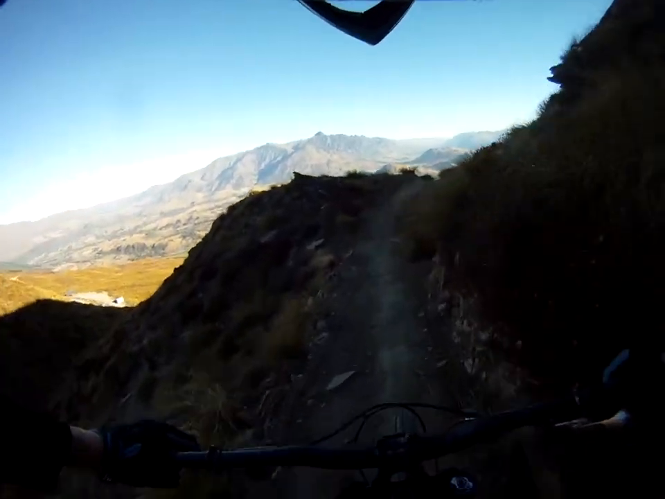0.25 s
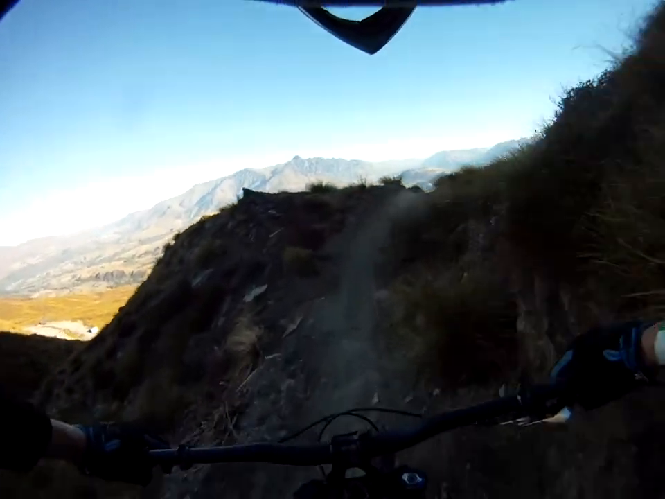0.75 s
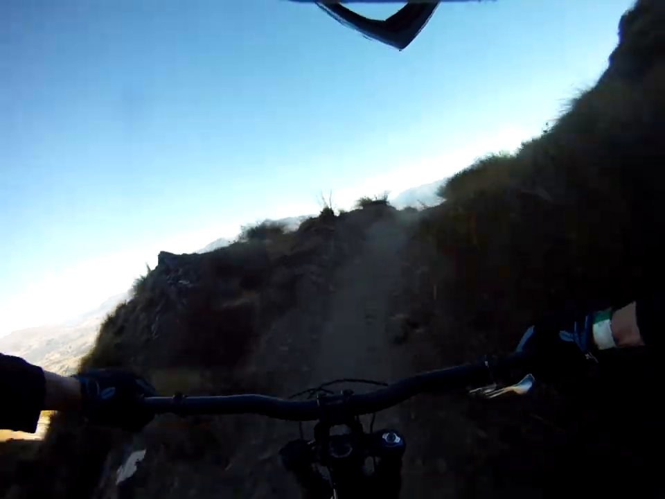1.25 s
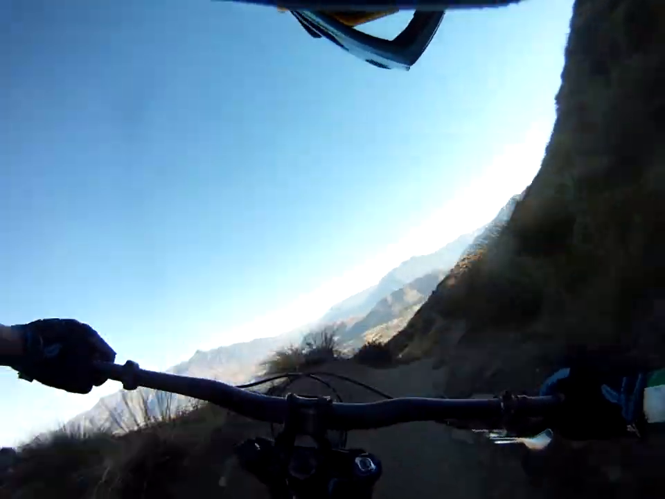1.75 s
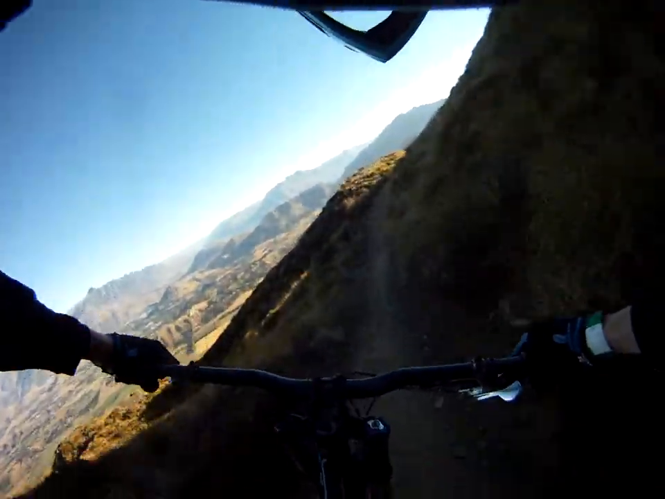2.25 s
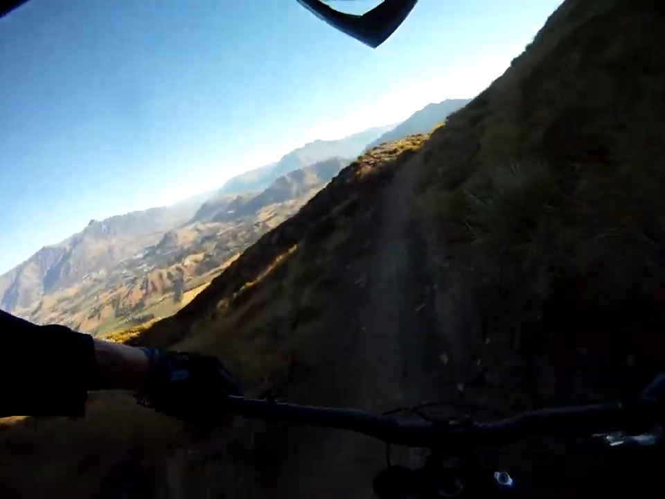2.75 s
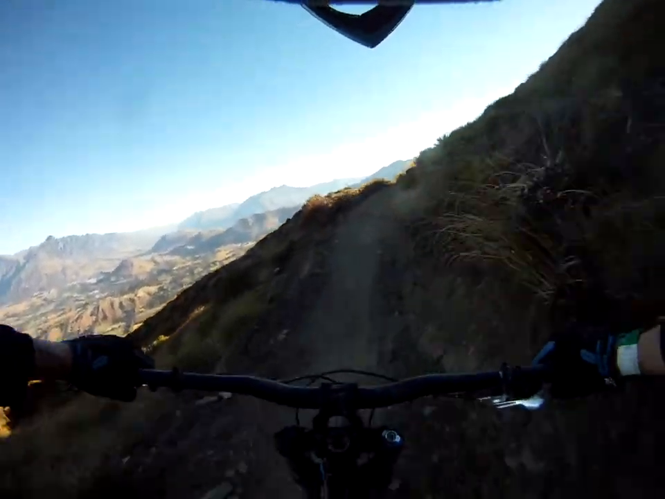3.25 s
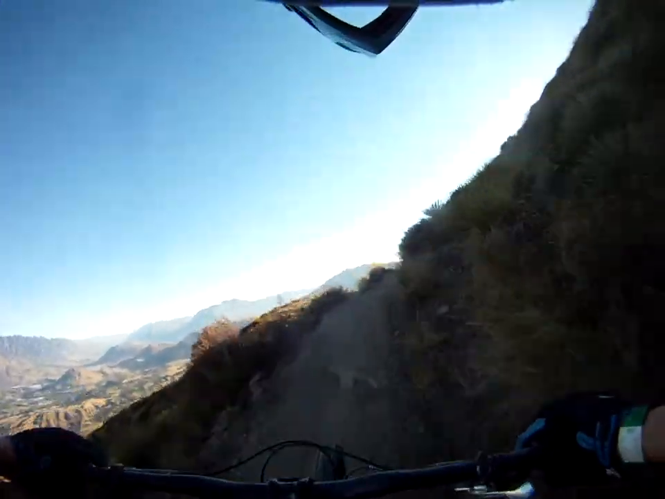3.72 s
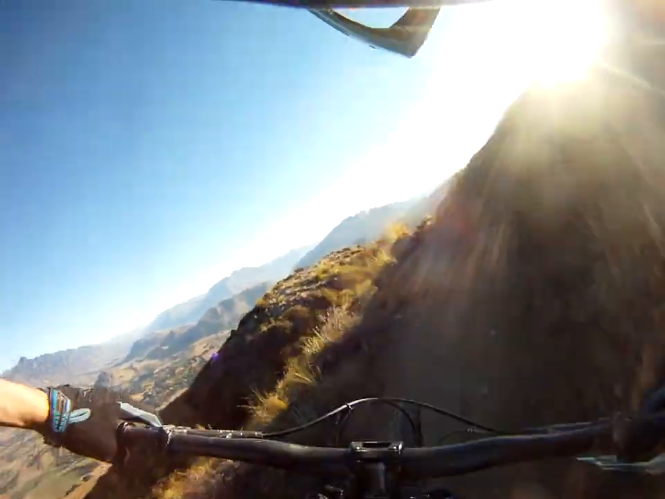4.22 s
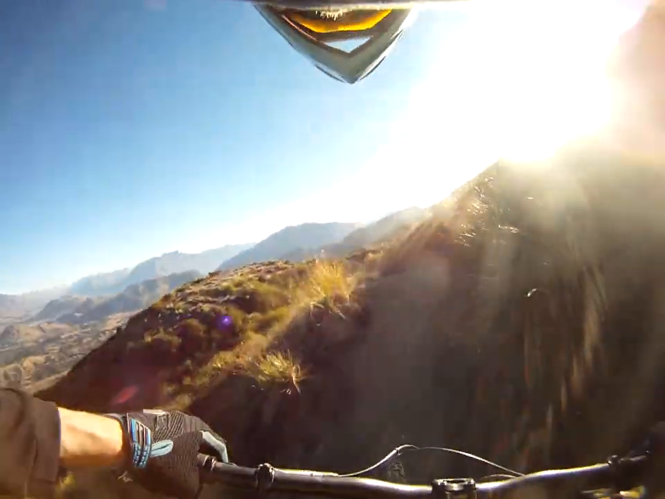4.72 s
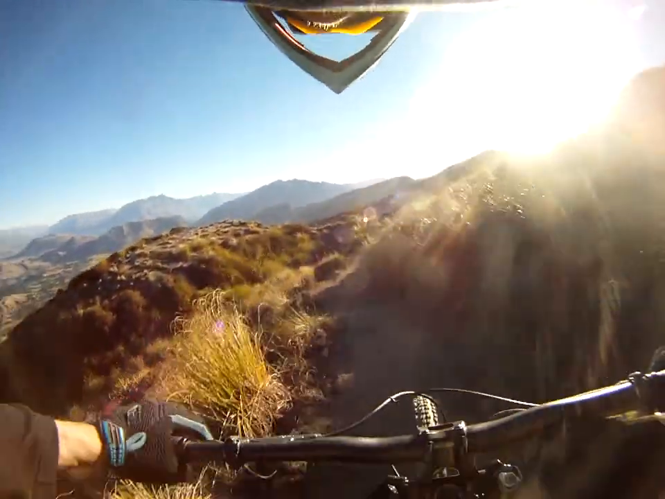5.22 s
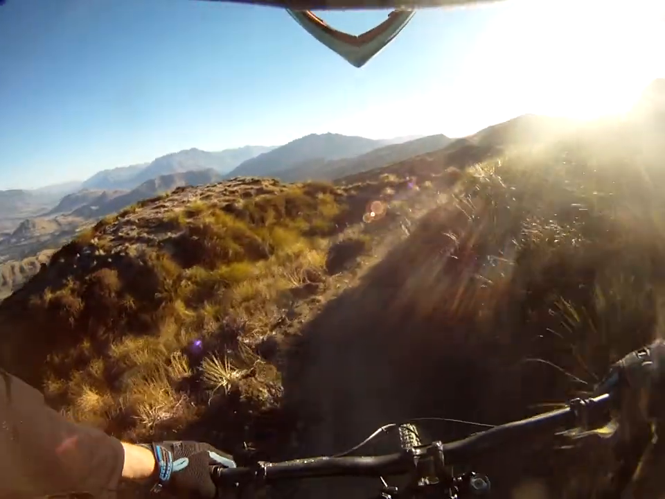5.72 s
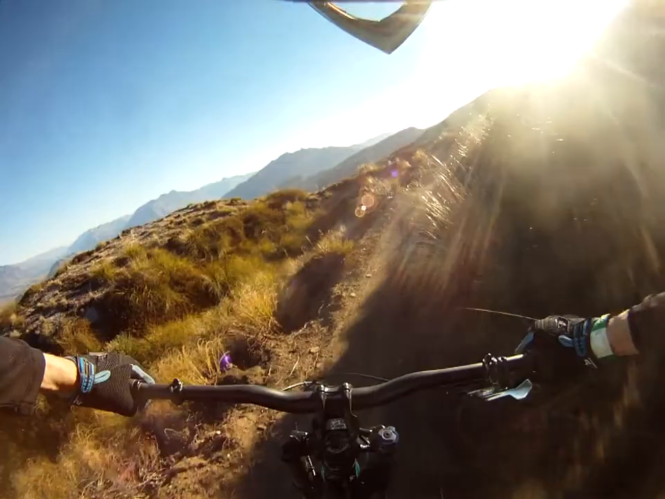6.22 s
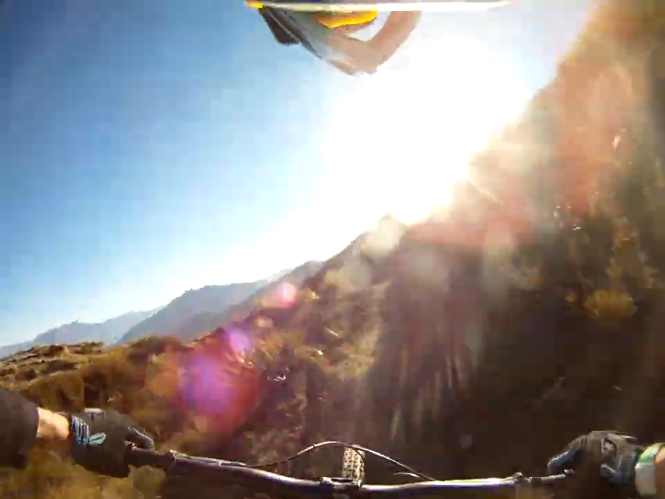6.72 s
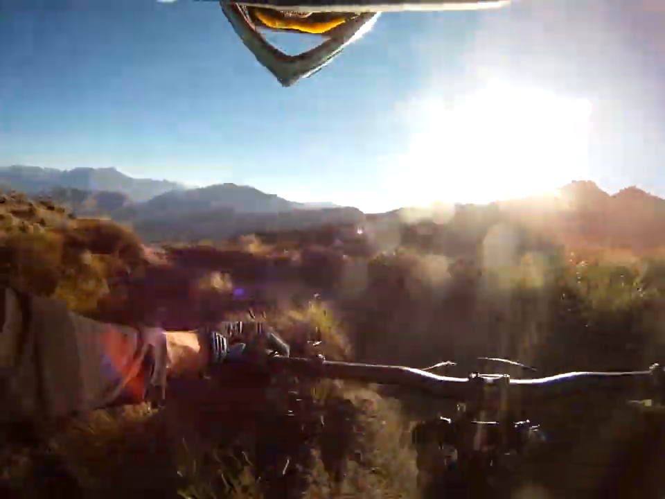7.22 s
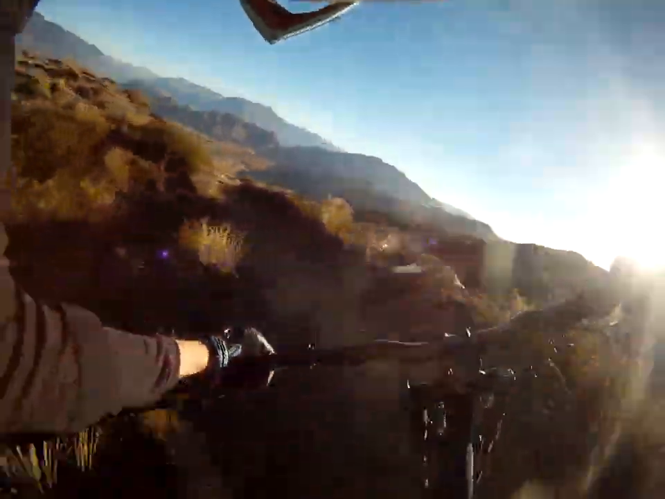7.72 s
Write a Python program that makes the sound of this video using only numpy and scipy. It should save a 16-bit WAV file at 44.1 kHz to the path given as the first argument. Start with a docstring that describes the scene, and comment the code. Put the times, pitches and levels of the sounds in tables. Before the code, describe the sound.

Deep, gusting wind pushes against a helmet-mounted microphone outdoors, over the steady rumble and gravelly crunch of mountain bike tyres. Short chain rattles, plastic knocks and light swishes of grass come and go, and a few stones ping near the middle. The ride eases a little, then speeds up towards the end into thuds, a tiny high chirp and a loud crack from the camera mount before rolling on.

```python
"""On a dry dirt trail, a mountain bike runs downhill, heard from a helmet camera in a plastic case.
Wind buffets the case and hisses past it. The tyres rumble, crunch over stones and spray grit.
Bumps thud through the bike and knock the camera in its mount; one hard hit makes a loud crack.
Chain and cables rattle, grass brushes by, loose stones ping and there is one brief, high chirp."""
import sys
import numpy as np
from scipy import signal
from scipy.fft import rfft, irfft, next_fast_len
from scipy.io import wavfile
from scipy.ndimage import uniform_filter1d

SR = 44100
rng = np.random.default_rng(int(sys.argv[2]) if len(sys.argv) > 2 else 0)


def int16_out(signal):
    """Quantize to a 16-bit WAV file."""
    q = np.round(np.clip(np.atleast_2d(signal).T, -1, 1) * 32767)
    wavfile.write(sys.argv[1], SR, q.astype(np.int16))


N = 351458
TIME = np.arange(N) / SR

# The tone colour of each sound. Each row: frequency in Hz, relative level in dB.
BUFFET_TONE = [(12, -23), (26, -1.5), (45, -2), (70, -0.5), (110, -4.5), (160, -8.5), (230, -14.5),
               (400, -44), (900, -68)]
RUMBLE_TONE = [(110, -22), (200, -5.5), (270, 0.5), (350, -1), (470, -3), (650, -11), (850, -23.5),
               (1200, -27), (2500, -56)]
CRUNCH_TONE = [(500, 1), (900, -2), (1200, -1.5), (1700, -1.5), (2300, 1.5), (3000, 2), (3600, -4.5),
               (4200, -8.5), (5500, -50), (9000, -24), (14000, -45)]
GRIT_TONE = [(1500, -58), (3200, 8.5), (4100, -4), (4700, 4), (5400, -6.5), (6200, -10), (6900, -6.5),
             (7300, 0), (7900, -5.5), (9000, 0), (10000, -8.5), (14000, -20), (15500, 2)]
TICK_TONE = [(700, 1.5), (1500, -0.5), (2400, 0), (3800, -4), (5000, -68), (7200, -25), (9000, -8),
             (15000, -29)]  # plastic on plastic
CRACK_TONE = [(500, -1), (1300, -5.5), (2100, 0.5), (3200, -3), (4050, 4.5), (4700, -23), (7400, -34),
              (7950, -1.5), (9000, -14), (10000, -11), (12000, -41), (14400, -14), (15500, -18)]
RATTLE_TONE = [(400, -7), (1000, 7), (1700, 3.5), (2500, 8), (3200, 16), (4000, -4.5), (4700, 4.5),
               (6000, -21), (7400, -3.5), (9000, 4.5), (10500, -15.5), (15000, -3)]
SWISH_TONE = [(1800, -3.5), (3300, 10.5), (4600, 2.5), (6000, -7.5), (7500, -0.5), (8800, 2), (10000, -12),
              (15000, -11)]
HISS_TONE = [(2000, -28), (3000, 3), (5500, -30), (8000, -19), (10500, -17), (15500, -17)]

# Slow changes along the ride. Each row: time in seconds, relative level in dB.
BIKE_SPEED = [(0.0, -58.5), (0.29, -55.5), (0.64, -58), (1.15, -54.5), (1.51, -55), (1.64, -57),
              (1.88, -62), (2.04, -63), (2.2, -64), (3.04, -56), (3.62, -54.5), (3.86, -57.5),
              (4.02, -58.5), (4.53, -62.5), (4.82, -58.5), (5.28, -64.5), (5.97, -67), (6.13, -63.5),
              (6.61, -54.5), (7.28, -65.5), (7.5, -63.5), (7.97, -61)]  # given as the level of the rushing air
WIND_EXPOSURE = [(0, 1), (2.5, 1), (3.1, -0.5), (3.6, 2), (4.1, -3), (4.4, -2.5), (4.65, -4), (6.15, 7),
                 (6.45, -3.5), (7.3, -5), (7.96, -5)]  # how squarely the wind meets the case as the head turns
GROUND_LOOSENESS = [(0, 0.5), (1.7, 5), (2.25, -2), (2.8, -5), (3.05, 4.5), (3.8, -1), (4.3, 2), (5.9, 2.5),
                    (6.45, 5.5), (7.1, .5), (7.96, 2)]  # from packed dirt to gravel

# Brief swells. Each row: middle in seconds, relative level in dB, length in seconds.
WIND_GUSTS = [(0.02, -5.5, 0.059), (0.17, 1, .2), (0.62, 5.5, 0.098), (1.73, -5, 0.12), (1.9, 7.5, .16),
              (2.44, 4.5, 0.16), (2.75, 3.5, 0.33), (4.18, -6, 0.14), (4.63, 7, 0.11), (7.91, 10, 0.056)]  # gusts (+) and shelter (-)
TYRE_LOADS = [(0.02, -5.5, 0.12), (0.47, -0.5, .3), (1.21, 1.5, 0.09), (2.24, -2.5, 0.4), (2.39, 4.5, 0.07),
              (3.03, 4, 0.11), (4.14, -7, 0.043), (4.28, 4, 0.11), (4.7, -3.5, 0.11), (4.88, 2.5, .1),
              (5.04, 3.5, .06), (5.6, -3, 0.094), (6.68, -5, .06), (6.78, -0.5, .14)]  # tyres press into dips (+) and go light over crests (-)
BRUSHES = [(0.159, -38, 0.0079), (0.172, -32, 0.0093), (0.256, -39.5, 0.04), (.290, -33, 0.012),
           (0.389, -34, 0.0089), (0.843, -36, 0.075), (1.209, -32, 0.019), (1.292, -33, 0.0095),
           (1.367, -34.5, 0.012), (1.486, -37, 0.024), (2.42, -51, 0.097), (2.608, -46, 0.049),
           (2.708, -41, 0.0093), (3.283, -31.5, 0.008), (3.325, -37, .01), (3.676, -33, 0.015),
           (3.765, -27.5, 0.0023), (4.285, -42, 0.06), (4.467, -41, 0.052), (6.594, -34.5, 0.034),
           (7.462, -45, .05)]  # grass and thrown grit touch the bike

# Single blows. Each row: start in seconds, relative level in dB, pitch in Hz.
WIND_SLAPS = [(0.209, -10, 58.6), (0.673, -7.5, 109), (.864, -6.5, 126), (1.055, -5, 75), (1.143, -6, 129),
              (2.004, -10, 59), (4.611, -13.5, 55), (4.633, -17, 55.4), (6.249, -11.5, 89)]  # eddies (swirls of air) hit the case
WHEEL_THUDS = [(.091, -7.5, 335), (.210, -17, 420), (2.251, -14, 270), (3.999, -11.5, 314),
               (4.163, -17.5, 397), (4.190, -7.5, 350), (4.320, -11, 517), (6.431, -11.5, 370),
               (6.492, -21, 614), (6.577, -13, 232)]
STONE_PINGS = [(2.972, -26, 2600), (2.996, -20.5, 2260), (3.023, -17.5, 2600), (3.079, -28, 1390),
               (3.791, -20.5, 3030), (3.999, -20.5, 2690)]

# The camera knocks. Each row: start in seconds, relative click and body levels in dB, body pitch factor.
MOUNT_KNOCKS = [(0.0134, -34.5, -27, 0.94), (0.2542, -37, -34.5, 0.93), (0.8894, -34.5, -36, 1.08),
                (2.084, -24, -32, 0.95), (2.0964, -38, -42, 1.16), (2.1714, -54, -42, 1.01),
                (4.0858, -36.5, -45, 1.01), (4.2616, -32, -35, 1.04), (4.5491, -20.5, -33, 0.89),
                (4.572, -38, -44, 1.3), (5.2401, -36.5, -30.5, 0.99), (5.6685, -53, -39, 1.06),
                (5.7469, -29.5, -44, 1.16), (5.9115, -35.5, -33.5, 1.06), (6.093, -41, -34, 1.03),
                (6.5195, -28, -22, 0.91), (6.6129, -23, -38, 1.06), (7.071, -40, -30.5, 0.94),
                (7.2272, -32, -29, 0.97), (7.4973, -28.5, -26, 0.98)]
# The ringing tones of the case and mount. Each row: pitch in Hz, relative level in dB,
# seconds to fade by 60 dB, share (0 to 1) driven by the sharp click rather than the body of the blow.
CASE_TONES = [(657, 11.5, 0.019, 0), (824, 2.5, 0.03, 0), (2705, 4.5, 0.0056, 1), (3140, -11, 0.015, 1),
              (9120, -14.5, 0.014, 1), (9900, -14, 0.02, 1), (14400, -9, .009, 1), (1200, -4, .026, 1),
              (2110, 0, .016, 1), (11350, -17, .026, .4), (12750, -19, .026, .4), ]
# The mount hits its stop. Each row: start in seconds, relative level in dB.
MOUNT_CRACKS = [(6.568, -7.5), (6.573, 4)]
# Chain and cables shake. Each row: start in seconds, relative treble and middle levels in dB.
CHAIN_RATTLES = [(0.09, -32, -27.5), (.132, -41, -29), (0.208, -31.5, -26), (.366, -36, -29.5),
                 (0.451, -36, -30), (0.914, -34, -30), (1.285, -29, -24.5), (1.858, -31, -28),
                 (3.7916, -33, -39), (3.998, -35, -30), (4.0429, -30.5, -26), (4.187, -31.5, -33),
                 (4.892, -35.5, -36), (5.176, -38, -35), (6.268, -30, -29), (6.431, -25, -21.5),
                 (6.46, -28, -45), (6.591, -47, -30)]
# Air pockets ring in the case. Each row: pitch in Hz, relative width, relative level in dB.
AIR_POCKETS = [(2930, 460, 8), (4630, 350, -1), (7140, 250, -2), (8995, 620, 4), (11600, 360, 3),
               (12600, 450, 2.5), (14840, 510, 2.5)]
# The tones in the chirp. Each row: pitch in Hz, relative level in dB.
CHIRP_TONES = [(955, -36.5), (1927, -38), (2905, -28), (3845, -35.5), (4790, -41), (7210, -40), (8160, -48),
               (9100, -43), (14900, -44)]

# Each layer's base level in dB at average speed, and the dB it gains for each dB of speed.
BUFFET_DB, LARGE_EDDY_GROWTH, SMALL_EDDY_GROWTH = -25, 0.65, 1.3
RUMBLE_DB, RUMBLE_GROWTH = -32.5, 1
CRUNCH_DB, CRUNCH_GROWTH = -47, 0.68
GRIT_DB, GRIT_GROWTH = -50, 0.34
CHATTER_DB, CHATTER_GROWTH = -48.5, 0.88
HISS_DB, HISS_GROWTH = -53.5, 1.1


def wind_buffet(turbulence, split_hz=71):
    """Swirling air pushes unevenly on the case, deeper at low speed, with a few single slaps on top."""
    push = tint(rng.standard_normal(N), BUFFET_TONE) * amp(1.3 * turbulence)
    push /= np.sqrt(uniform_filter1d(push ** 2, size=6000))  # even out slow, chance changes in level
    large_eddies = signal.sosfiltfilt(signal.butter(2, split_hz, fs=SR, output="sos"), push)
    small_eddies = push - large_eddies
    out = large_eddies * speed_gain(LARGE_EDDY_GROWTH) + small_eddies * speed_gain(SMALL_EDDY_GROWTH)
    out *= amp(BUFFET_DB + curve(WIND_EXPOSURE) + surges(WIND_GUSTS))
    for start, db, hz in WIND_SLAPS:
        cycle = np.arange(0, 1, hz / SR)
        slap = -np.sin(2 * np.pi * cycle) * np.sin(np.pi * cycle)  # a pull, then a push
        add(out, start, amp(db) * slap)
    return out


def tyres():
    """The tread drums on dirt, more under load; stones and grit also grow louder on loose ground."""
    roughness, load_db, loose_db = wander(38), surges(TYRE_LOADS), curve(GROUND_LOOSENESS)
    rumble = tint(rng.standard_normal(N) + 0.52 * grains(300, spread_db=2), RUMBLE_TONE)
    rumble *= amp(RUMBLE_DB + 2 * roughness + 0.88 * load_db) * speed_gain(RUMBLE_GROWTH)
    hits = grains(200, spread_db=3) * amp(2.5 * wander(9))
    stones = unit(signal.oaconvolve(hits, burst(TIME[:400], decay_s=0.0015))[:N])
    crunch = tint(rng.standard_normal(N) + 0.33 * grains(1500, spread_db=4) + 0.64 * stones, CRUNCH_TONE)
    crunch *= amp(CRUNCH_DB + 2.55 * roughness + 0.91 * load_db + 0.43 * loose_db)
    grit = tint(rng.standard_normal(N) + 0.89 * grains(1200, spread_db=4.5), GRIT_TONE)
    grit *= amp(GRIT_DB + roughness + wander(86) + 0.4 * load_db + loose_db)
    return rumble + crunch * speed_gain(CRUNCH_GROWTH) + grit * speed_gain(GRIT_GROWTH)


def wheel_thuds():
    """The wheels hit bumps, each giving a short, low note."""
    return amp(7.5) * struck(WHEEL_THUDS, fade_s=0.013, rise_s=0.0011)


def mount_cracks():
    """The mount hits its stop: a judder that shakes all pitches alike, then a faint chatter."""
    out, t = np.zeros(N), TIME[:2000]
    for start, db in MOUNT_CRACKS:
        phases = np.angle(rfft(burst(t, decay_s=0.0016)))
        judder = irfft(np.exp(1j * phases)) * np.exp(-t / 0.01)
        tail = 0.22 * burst(t, decay_s=0.01)
        snap = np.convolve(judder + tail, shaped_click(CRACK_TONE))
        add(out, start, amp(db + 11.5) * snap / np.linalg.norm(snap))
    return out


def camera_knocks():
    """The camera ticks against its mount and the case rings; low tones take longer to build up."""
    out, t = np.zeros(N), TIME[:2600]
    hz, tone_db, fade_s, click_share = np.transpose(CASE_TONES)[:, :, None]
    tick = shaped_click(TICK_TONE)
    build_up = 1 - np.exp(-t / (0.0006 + 1 / hz))
    for start, click_db, body_db, pitch in MOUNT_KNOCKS:
        drive_db = 8.5 + tone_db + click_share * click_db + (1 - click_share) * body_db
        tuned_hz = np.where(click_share > 0.2, hz, hz * pitch)  # only the body tones shift
        waves = np.cos(2 * np.pi * (tuned_hz * t + rng.random(hz.shape)))
        ringing = amp(drive_db - 60 * t / fade_s) * build_up * waves
        contact = np.convolve(burst(t, decay_s=0.0023), tick)[:len(t)] * amp(click_db + 18)
        add(out, start + 0.0006, ringing.sum(0) + contact)
    return out


def chain_rattles(split_hz=3500):
    """Chain and cables shake in short flurries of tiny hits, some dull and some bright."""
    out, t = np.zeros(N), TIME[:2600]
    ring = shaped_click(RATTLE_TONE)
    low, high = (signal.butter(3, split_hz, kind, fs=SR, output="sos") for kind in ("low", "high"))
    for start, treble_db, middle_db in CHAIN_RATTLES:
        hits = burst(t, decay_s=0.0042) + 0.27 * burst(t, decay_s=0.014)
        flurry = signal.fftconvolve(hits, ring)
        treble = amp(treble_db + 25.5) * signal.sosfilt(high, flurry)
        middle = amp(middle_db + 21) * signal.sosfilt(low, flurry)
        add(out, start + 0.001038, treble + middle)
    return out


def grass_swishes():
    """Grass and thrown grit brush the bike: bright, grainy noise that swells and fades."""
    loudness = sum(amp(db) * swell(middle, length) for middle, db, length in BRUSHES)
    specks = grains(3000, spread_db=7)
    return loudness * tint(rng.standard_normal(N) + specks, SWISH_TONE)


def stone_pings():
    """Loose stones fly off the tyres, each with a short, high note."""
    return amp(5.5) * struck(STONE_PINGS, fade_s=0.01, rise_s=0.001)


def short_chirp(start_s=6.461, end_s=6.478, pitch_waver=0.006):
    """A brief, high, ringing chirp whose pitch wavers slightly."""
    out, count = np.zeros(N), round((end_s - start_s) * SR)
    uneven_time = np.cumsum(1 + pitch_waver * wander(400)[:count]) / SR
    tone = sum(amp(db) * np.sin(2 * np.pi * (hz * uneven_time + rng.random())) for hz, db in CHIRP_TONES)
    add(out, start_s, amp(-1.5) * tone * signal.windows.tukey(count, 0.3))
    return out


def case_chatter():
    """Small stones tick against the case and ring its strongest air pockets, more under load."""
    ticks = grains(400, spread_db=2.2) * amp(3 * wander(35))
    ring = unit(irfft(rfft(ticks) * pocket_gain(np.fft.rfftfreq(N, 1 / SR)) ** 2.6, N))
    return ring * speed_gain(CHATTER_GROWTH) * amp(CHATTER_DB + 1.26 * surges(TYRE_LOADS))


def air_hiss(turbulence):
    """Rushing air sounds the air pockets of the case and flutters with the eddies."""
    hz = np.fft.rfftfreq(N, 1 / SR)
    colour = tone_gain(HISS_TONE, hz) + pocket_gain(hz)
    hiss = unit(irfft(rfft(rng.standard_normal(N)) * colour, N))
    flutter_db = 2.6 * turbulence + 2.7 * wander(170)
    return hiss * speed_gain(HISS_GROWTH) * amp(HISS_DB + 0.25 * surges(WIND_GUSTS) + flutter_db)


def pocket_gain(hz):
    """How strongly the air pockets of the case ring at each frequency."""
    return sum(amp(db) / (1 + (2 * (hz - pitch) / (2.9 * width)) ** 2) ** 2
               for pitch, width, db in AIR_POCKETS)


def speed_gain(growth):
    """Turns a layer up as the bike goes faster."""
    speed_db = curve(BIKE_SPEED)
    return amp(growth * (speed_db - speed_db.mean()))


def struck(rows, fade_s, rise_s):
    """Blows that each ring with one tone, which dies away by 60 dB in fade_s."""
    out, t = np.zeros(N), TIME[:3000]
    for start, db, hz in rows:
        loudness = amp(db - 60 * t / fade_s) * (1 - np.exp(-t / rise_s))
        add(out, start, loudness * np.sin(2 * np.pi * hz * t))
    return out


def grains(per_s, spread_db):
    """Scattered clicks, mostly small and a few large."""
    size = amp(spread_db * np.minimum(rng.exponential(1, N), 4))
    return unit(size * rng.choice([-1, 1], N) * (rng.random(N) < per_s / SR))


def burst(t, decay_s):
    """A dying flurry of tiny contacts, with a total energy of one."""
    flurry = rng.standard_normal(len(t)) * np.exp(-t / decay_s)
    return flurry / np.linalg.norm(flurry)


def wander(hz):
    """A smooth random wobble, with changes up to about hz."""
    return unit(signal.sosfilt(signal.butter(2, hz, fs=SR, output="sos"), rng.standard_normal(N)))


def tone_gain(points, hz):
    """The gain of a tone colour at the given frequencies."""
    point_hz, db = np.transpose(points)
    return amp(np.interp(np.log(hz + 1), np.log(point_hz), db))


def tint(x, points):
    """Gives a long sound a tone colour and an average level of one."""
    size = next_fast_len(len(x))
    gain = tone_gain(points, np.fft.rfftfreq(size, 1 / SR))
    return unit(irfft(rfft(x, size) * gain, size)[:len(x)])


def shaped_click(points, size=1024):
    """One click with the given tone colour and a total energy of one."""
    log_gain = np.log(tone_gain(points, abs(np.fft.fftfreq(size, 1 / SR))))
    spectrum = np.exp(signal.hilbert(log_gain).conj())  # packs the energy at the start
    click = np.fft.ifft(spectrum).real[:size // 2]
    return click / np.linalg.norm(click)


def curve(points):
    """Joins points in time with straight lines."""
    return np.interp(TIME, *np.transpose(points))


def swell(middle_s, length_s):
    """A smooth rise to one and fall around a moment."""
    return np.exp(-np.minimum((2 * (TIME - middle_s) / length_s) ** 2, 20))


def surges(rows):
    """Brief rises and dips of a level, in dB."""
    return sum(db * swell(middle, length) for middle, db, length in rows)


def amp(db):
    """Turns decibels into a gain to multiply by."""
    return 10 ** (np.asarray(db) / 20)


def unit(x):
    """Scales a signal to an average (rms) level of one."""
    return x / np.sqrt(np.mean(x ** 2) + 1e-20)


def add(mix, start_s, sound):
    """Mixes a sound in at the given time."""
    part = mix[max(round(start_s * SR), 0):][:len(sound)]
    part += sound[:len(part)]


def scene():
    """Wind, trail and bike together at the camera, in one channel."""
    turbulence = wander(15.7)  # the same eddies shake both the buffeting and the hiss
    trail = tyres() + grass_swishes() + stone_pings()
    bike = wheel_thuds() + chain_rattles() + case_chatter()
    chirp = short_chirp()
    wind = wind_buffet(turbulence) + air_hiss(turbulence)
    return (wind + trail + bike + chirp + camera_knocks() + mount_cracks())[None]


def record(dry, top_hz=15500):
    """The loudest crack overloads the microphone input; then the highest treble is cut away."""
    treble_cut = signal.firwin(401, top_hz, window=("kaiser", 8), fs=SR)
    return signal.oaconvolve(np.clip(dry, -1, 1), treble_cut[None], "same")


dry = scene()
out = record(dry)
int16_out(out)
```